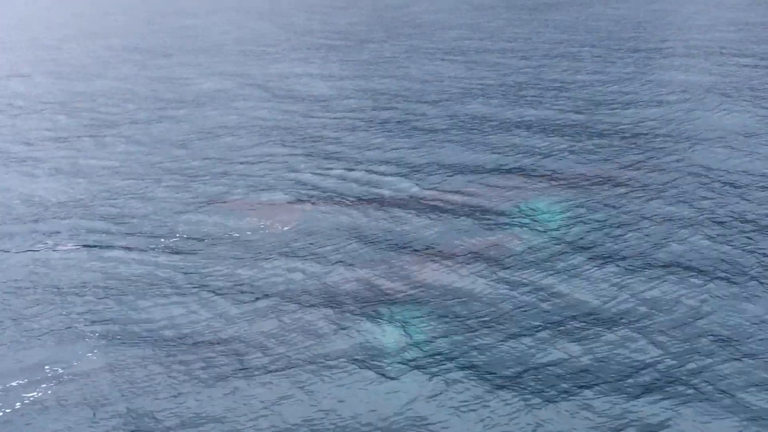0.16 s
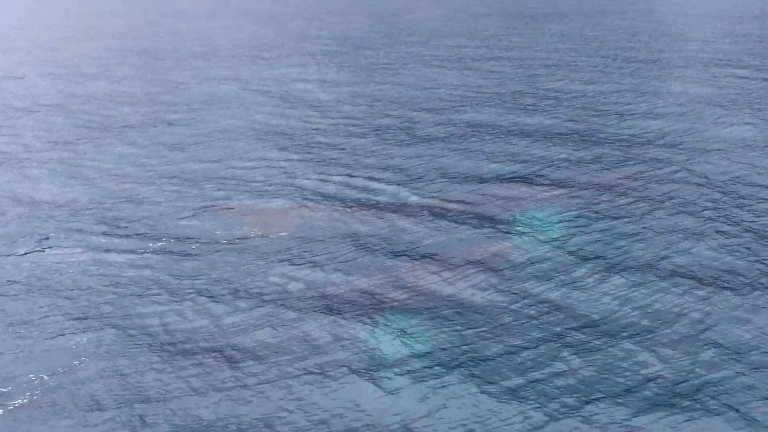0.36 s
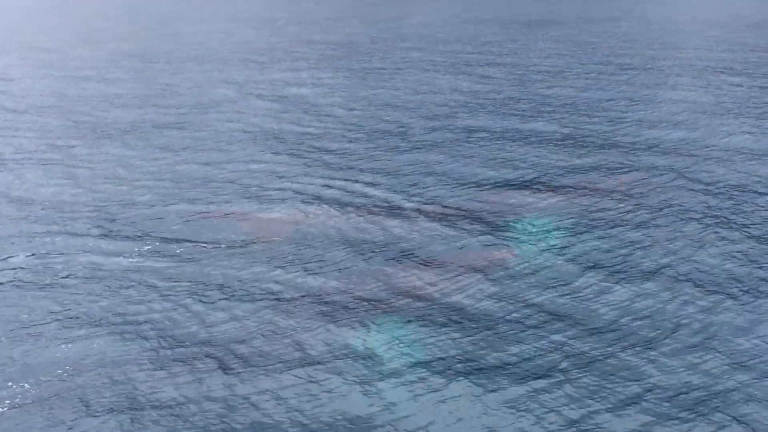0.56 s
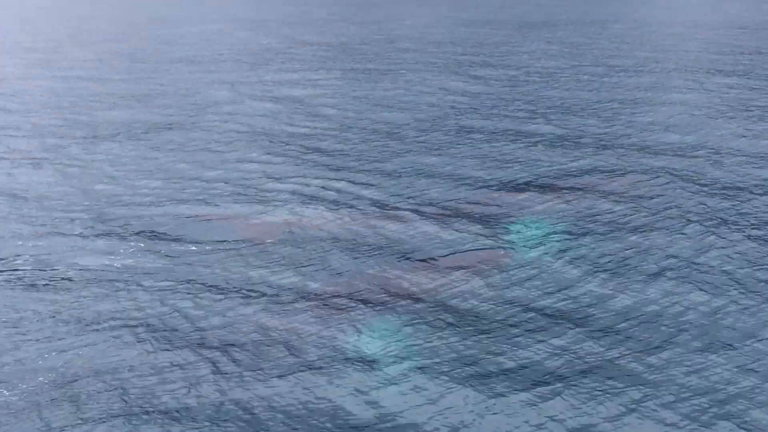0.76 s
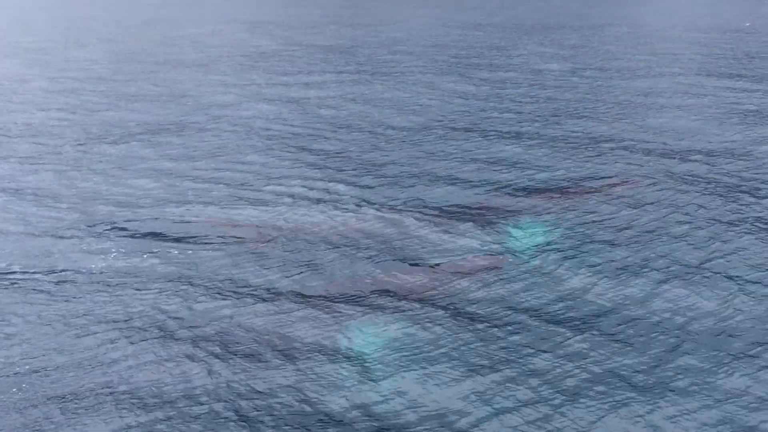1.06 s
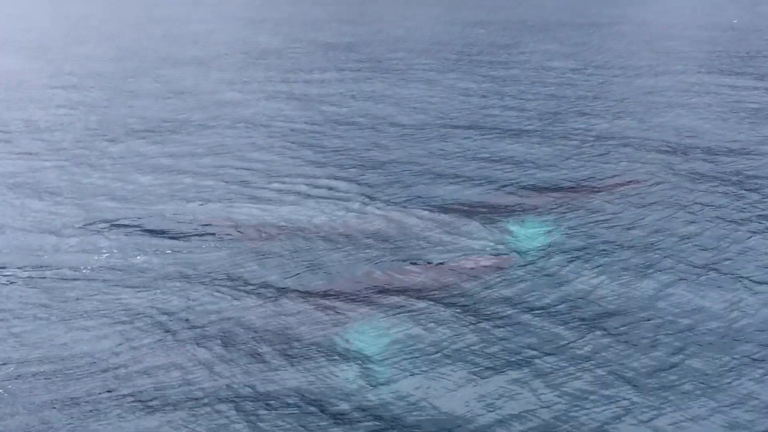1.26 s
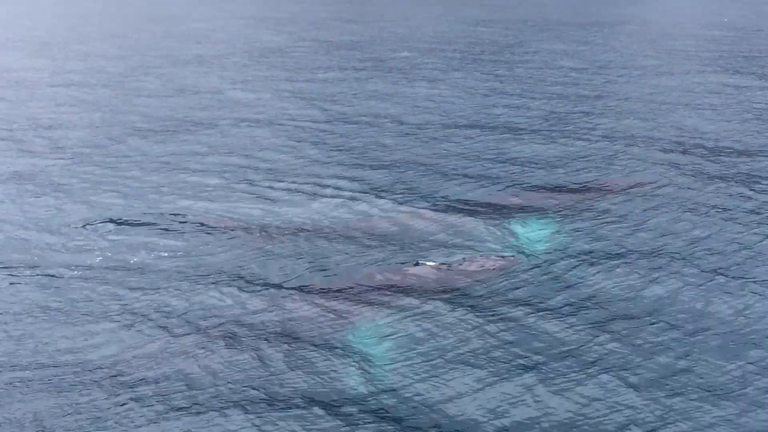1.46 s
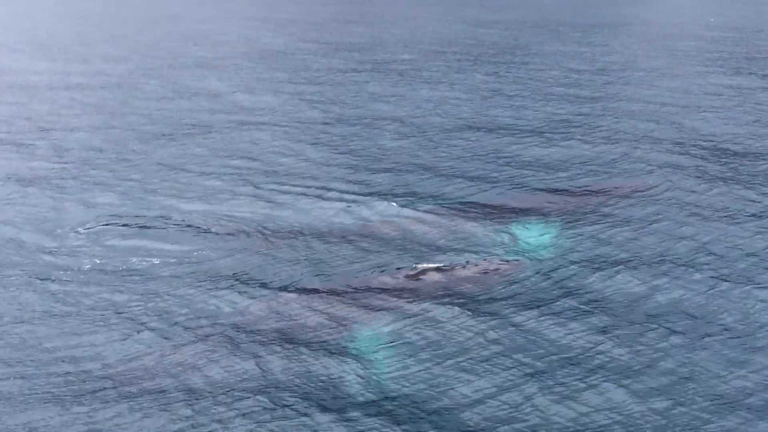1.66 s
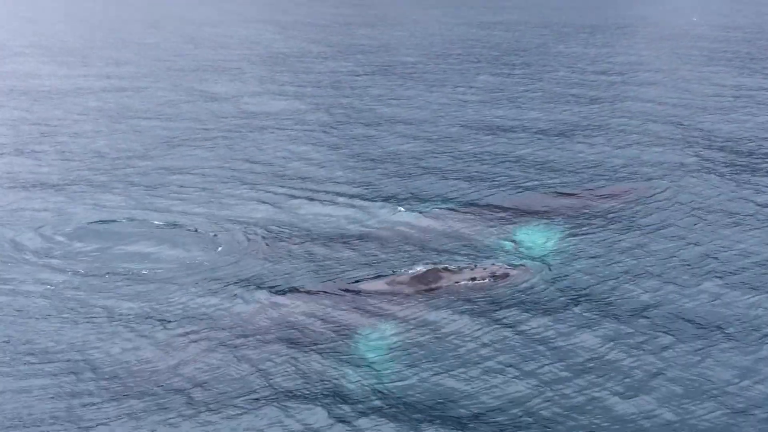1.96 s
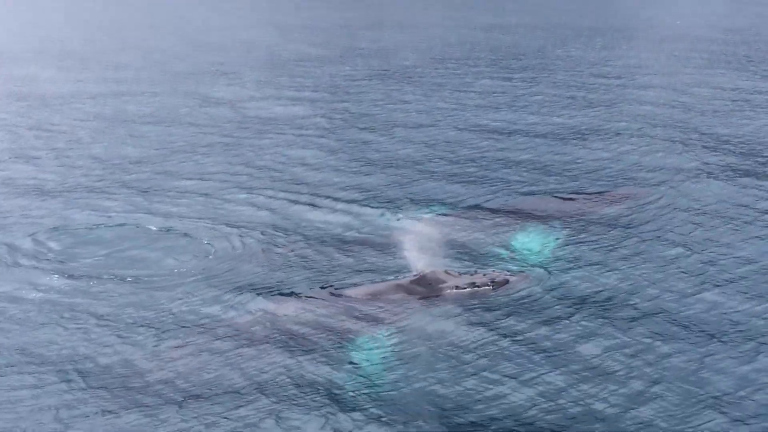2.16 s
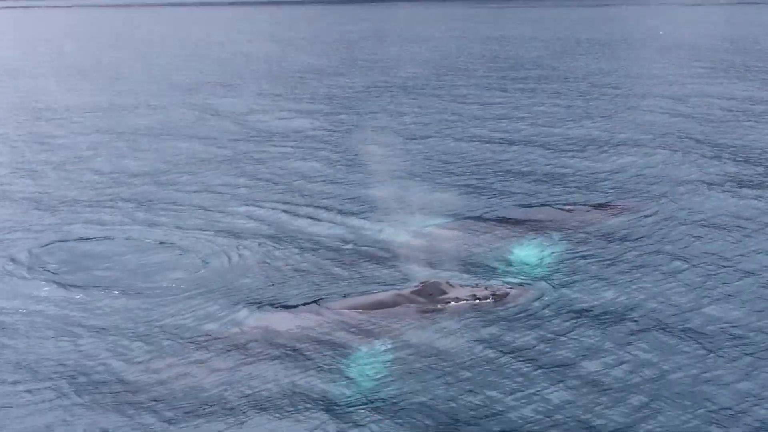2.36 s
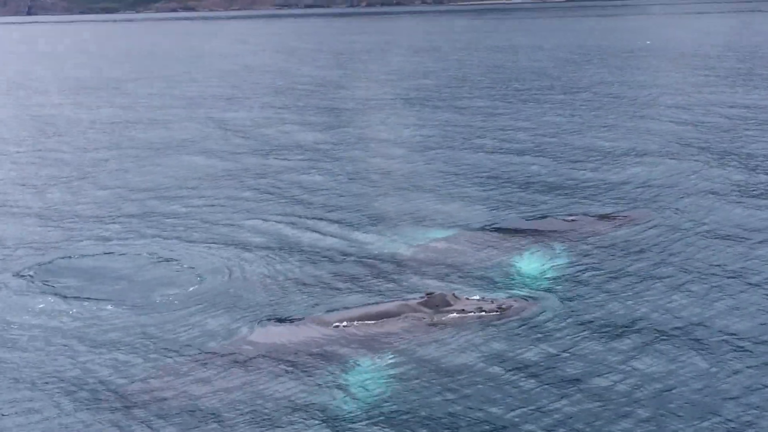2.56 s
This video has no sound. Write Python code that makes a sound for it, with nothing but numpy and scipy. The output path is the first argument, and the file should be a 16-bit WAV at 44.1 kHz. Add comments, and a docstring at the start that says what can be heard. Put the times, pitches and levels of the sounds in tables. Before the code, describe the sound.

Whale blow: a sudden breathy whoosh with spray near the end, after engine hum and wind thuds

```python
"""Open water, on deck of an idling boat: a whale surfaces and blows nearby, one microphone in the wind.
The blow opens with a noise spit, swells to a jet with hollow airway resonances and spray, and darkens as it fades.
The engine is a stack of sine orders with hull rings and a thin whine; gusts and flutter are shaped noise.
Wavelets slap as short broad resonances, gear ticks and knocks as struck noise, and the sea is a steady wash."""
import sys
import numpy as np
from scipy import signal
from scipy.fft import rfft, irfft
from scipy.io import wavfile

SR = 44100
rng = np.random.default_rng(int(sys.argv[2]) if len(sys.argv) > 2 else 0)


def wav_out(sig):
    """Save sig, one row per channel (or a flat mono array), as 16-bit PCM at SR to the path in sys.argv[1]."""
    wavfile.write(sys.argv[1], SR, np.round(np.clip(np.atleast_2d(sig).T, -1, 1) * 32767).astype(np.int16))


N = 119511
T = np.arange(N) / SR

# Every colour table is relative: its noise is scaled to rms 1 before a level is applied.
# force of the blow [t/s, level/dB]
BLOW_FORCE = [(2.08, -78), (2.12, -55.5), (2.175, -44), (2.24, -31.5), (2.33, -30), (2.41, -31), (2.5, -36),
              (2.6, -39), (2.71, -44)]
# jet colour with the blowhole at full pressure, then slack [f/Hz, level/dB per Hz]
JET_FULL_COLOUR = [(150, -4), (400, -3.5), (750, 4), (1080, -2.5), (1400, 4), (1850, -4.5), (2300, -2.5),
                   (2900, -5.5), (4300, -6), (5400, -9.5), (7000, -9), (9500, -14.5), (15000, -23)]
JET_SLACK_COLOUR = [(150, -11), (330, 1), (700, -6.5), (1080, -2.5), (1500, -3), (2000, -3), (3500, -9.5),
                    (5000, -11), (8000, -12.5), (10500, -23), (15000, -32)]
SLACK_FROM_S, SLACK_TO_S = 2.332, 2.573
JET_DB, JET_ROUGH_DB = -2, 1
SPUTTER_DB = 0.56  # added roughness as the pressure falls
# resonances of the airway [f/Hz, width/Hz, level at full pressure/dB, level when slack/dB]
AIRWAY_RESONANCES = [(677, 35, -16.5, -7), (785, 37, -15, -30), (908, 21, -13, -10), (1140, 18, -19, -13),
                     (1340, 135, -9.5, -34), (1544, 150, -14, -15.5), (2210, 140, -19.5, -25),
                     (3420, 430, -18, -26), (4660, 120, -19.5, -33), (6630, 90, -22, -40),
                     (7610, 120, -30, -36)]
AIRWAY_WAVER = 0.00607  # share of each pitch
AIRWAY_LEAD_S = 0.01  # the hollow tone builds a little ahead of the hiss
PUFF_DB, PUFF_HZ = 0.5, 30
# spit as the blowhole opens [f/Hz, level/dB per Hz]
SPIT_NOISE_COLOUR = [(800, -15), (2200, 3), (3500, 2), (7000, -5), (9000, -13), (15000, -21)]
SPIT_S, SPIT_DB, SPIT_DECAY_S = 2.091, -52, 0.015
# spray drops [f/Hz, level/dB per Hz]
DROP_COLOUR = [(800, -12), (3000, 0), (8000, -4.5), (10000, -8.5), (15000, -11)]
DROPS_PER_S, SPRAY_DB, SPRAY_LAG_S = 1400, -14, 0.034
# water fizzing off the whale's back; the half length is one standard deviation
SURFACE_S, SURFACE_HALF_S, SURFACE_DB = 1.5, 0.12, -74.5

# engine orders [multiple of the firing rate, level/dB]
ENGINE_ORDERS = [(.5, -45.5), (1, -25), (1.75, -51.5), (2, -62), (3.5, -57)]
FIRING_HZ, SPEED_WOBBLE, HUM_WOBBLE_DB = 75.72, 0.0046, 0.5
# rise and fall of the hum [t/s, level/dB]
HUM_SWELL = [(0, -1.5), (.15, -8.5), (.22, -3), (.36, -4), (.44, -5), (.53, 0), (.63, -5.5), (.72, 5.5),
             (.82, -2), (.9, 2.5), (1.05, -1.5), (1.12, 1.5), (1.22, -4.5), (1.36, -0.5), (2.4, 0),
             (2.58, 1.5), (2.71, 1)]
# narrow rings of hull and machinery [f/Hz, width/Hz, level/dB]
HULL_RINGS = [(113.5, 25, -49.5), (193.3, 26.5, -51.5), (489.3, 12, -57.5), (639, 10, -67.5),
              (907, 39, -67.5), (1826, 250, -68), (3355, 480, -71.5)]
WHINE_HZ, WHINE_WIDTH_HZ, WHINE_DB = 3425, 110, -70.5
WHINE_WAVER, WHINE_FLICKER_DB = 0.012, 2.5  # waver as a share of the pitch

# gusts that thud on the microphone [start t/s, end t/s, level/dB]
GUST_TIMES = [(-.05, 0.043, -29.5), (0.664, 0.793, -27), (0.837, 0.994, -29), (1.053, 1.198, -32),
              (2.38, 2.564, -34.5), (2.545, 2.76, -32)]
GUST_EDGE_S = 0.061
# colour of the gusts [f/Hz, level/dB per Hz]
GUST_NOISE_COLOUR = [(18, -43), (37, -6.5), (55, -9), (76, -4), (98, -7), (119, -1), (146, -23.5),
                     (300, -47.5), (1000, -65.5), (8000, -110)]
# lighter breeze at the microphone [t/s, level/dB]
BREEZE_LEVEL = [(0, -29), (.05, -31), (.2, -35), (.33, -34.5), (.45, -37), (.54, -37.5), (.63, -38.5),
                (.75, -48), (1.12, -62.5), (1.22, -38), (1.34, -42.5), (2.3, -56), (2.45, -54), (2.71, -40)]
# colour of the breeze [f/Hz, level/dB per Hz]
BREEZE_NOISE_COLOUR = [(25, -30), (70, 5), (160, 9.5), (260, -2.5), (500, -9), (900, -23), (1500, -37),
                       (4000, -55.5), (15000, -76.5)]
FLUTTER_DB, FLUTTER_HZ = 2, 44.5

# hollow slaps of water [peak t/s, level/dB, f/Hz, time scale either side/s]
WATER_SLAPS = [(.008, -26.5, 378, 0.0085), (.137, -29, 763, 0.0034), (0.139, -24, 290.2, 0.013),
               (0.238, -34.5, 480, 0.0029), (0.4, -34.5, 218.3, 0.0028), (0.494, -46, 520, .008),
               (.528, -36.5, 460, 0.0032), (1.027, -46, 420, 0.0065), (1.224, -37.5, 185, .018),
               (2.44, -31.5, 640, 0.0048), (2.465, -36, 620, 0.0079), (2.524, -34.5, 680, 0.011),
               (2.653, -40, 640, 0.051)]
SLAP_WIDTH = 0.8  # share of the pitch

# small ticks on deck [t/s, level/dB]
DECK_TICKS = [(0.813, -48), (1.811, -55)]
TICK_DECAY_S = 0.0015
# colour of the ticks [f/Hz, level/dB per Hz]
TICK_NOISE_COLOUR = [(500, -6), (2400, 4.5), (4000, -7), (6500, 1.5), (9500, -10), (15000, -15)]
# colour of the one knock, then of its tail [f/Hz, level/dB per Hz]
KNOCK_NOISE_COLOUR = [(300, -15), (700, 19.5), (1400, -4), (2350, 4.5), (3500, -5), (6000, -18),
                      (14000, -41)]
KNOCK_TAIL_COLOUR = [(250, -3.5), (680, 6), (1400, -11), (2500, -7.5), (3800, -2.5), (5500, -18.5),
                     (12000, -41)]
KNOCK_S, KNOCK_DB, KNOCK_DECAY_S = 0.860, -34.5, 0.013
KNOCK_TAIL_DB, KNOCK_TAIL_S = -51, 0.11

# steady wash of sea and engine [f/Hz, level/dB per Hz]
WASH_COLOUR = [(20, -23), (45, -1.5), (100, 2), (180, -7), (300, -13), (560, -24), (1150, -24.5),
               (1750, -34), (2500, -40), (4100, -45), (4900, -44), (5800, -48.5), (7000, -50), (10000, -58),
               (15000, -72)]
WASH_DB, HISS_DB = -39, -76.5
# level of the background above the bass [t/s, level/dB]
BACKGROUND_SWELL = [(0, 1), (.7, 1), (.98, -1.5), (1.14, -3), (1.22, -1.5), (1.4, 0), (1.6, 0.5),
                    (2.71, 2.5)]
EDGE_HZ = 15350  # upper limit of the recorder


def amp(db):
    """Decibels to gain."""
    return 10 ** (np.asarray(db) / 20)


def unit(x):
    """Scales to rms 1."""
    return x / np.sqrt(np.mean(x ** 2) + 1e-20)


def curve(points):
    """Joins (t/s, value) points by straight lines."""
    return np.interp(T, *np.transpose(points))


def colour(x, points):
    """Filters by an (f/Hz, level/dB) table and scales to rms 1."""
    hz, db = np.transpose(points)
    f = np.fft.rfftfreq(N, 1 / SR)
    gain = amp(np.interp(np.log(f + 1), np.log(hz), db))
    return unit(irfft(rfft(x) * gain, N))


def noise(points):
    """Noise of a given colour, rms 1."""
    return colour(rng.standard_normal(N), points)


def drift(rate_hz):
    """Smooth random wander, rms 1, rolling off above a rate."""
    f = np.fft.rfftfreq(N, 1 / SR)
    gain = (f > 0) / (1 + (f / rate_hz) ** 4)
    return unit(irfft(rfft(rng.standard_normal(N)) * gain, N))


def ring(hz, width_hz):
    """A resonance stirred by turbulence, rms 1; its centre may move."""
    phase = 2 * np.pi * np.cumsum(hz * np.ones(N)) / SR
    return unit(drift(width_hz / 2) * np.cos(phase) + drift(width_hz / 2) * np.sin(phase))


def strike(start, decay_s, rise_s):
    """Quick rise and exponential fall."""
    age = np.maximum(T - start, 0)
    return (1 - np.exp(-age / rise_s)) * np.exp(-age / decay_s)


def whale():
    """A spit as the blowhole opens, then a turbulent jet that puffs through the airway, and spray."""
    force = amp(curve(BLOW_FORCE)) * (T > BLOW_FORCE[0][0])
    slack = np.clip((T - SLACK_FROM_S) / (SLACK_TO_S - SLACK_FROM_S), 0, 1)
    jet = np.sqrt(1 - slack) * noise(JET_FULL_COLOUR) + np.sqrt(slack) * noise(JET_SLACK_COLOUR)
    airway = 0
    for hz, width, full_db, slack_db in AIRWAY_RESONANCES:
        level = amp(full_db + (slack_db - full_db) * slack)
        airway = airway + level * ring(hz * (1 + AIRWAY_WAVER * drift(12)), width)
    early_force = np.interp(T + AIRWAY_LEAD_S, T, force)
    puffs = np.maximum(force, early_force) * amp(PUFF_DB * drift(PUFF_HZ))
    roughness = amp((JET_ROUGH_DB + SPUTTER_DB * slack) * drift(110))
    air = (force * amp(JET_DB) * jet + puffs * airway) * roughness
    spray = amp(SPRAY_DB) * np.interp(T - SPRAY_LAG_S, T, force) * droplets()
    spit = amp(SPIT_DB) * strike(SPIT_S, SPIT_DECAY_S, 0.001) * noise(SPIT_NOISE_COLOUR)
    return air + spray + spit


def droplets():
    """Dense small drops of equal size: random clicks of either sign, coloured."""
    hits = rng.random(N) < DROPS_PER_S / SR
    return colour(hits * rng.choice([-1, 1], N), DROP_COLOUR)


def surfacing():
    """Water runs off the back as it breaks the surface."""
    swell = np.exp(-0.5 * ((T - SURFACE_S) / SURFACE_HALF_S) ** 2)
    return amp(SURFACE_DB) * swell * droplets()


def engine():
    """Orders of one slightly unsteady firing rate, rings of the hull, and a grainy whine."""
    turns = np.cumsum(FIRING_HZ * (1 + SPEED_WOBBLE * drift(5))) / SR
    hum = 0
    for order, db in ENGINE_ORDERS:
        hum = hum + amp(db) * np.sqrt(2) * np.sin(2 * np.pi * (order * turns + rng.random()))
    hum = hum * amp(curve(HUM_SWELL) + HUM_WOBBLE_DB * drift(42))
    rings = sum(amp(db) * ring(hz, width) for hz, width, db in HULL_RINGS)
    whine_level = amp(WHINE_DB + WHINE_FLICKER_DB * drift(25))
    whine = whine_level * ring(WHINE_HZ * (1 + WHINE_WAVER * drift(90)), WHINE_WIDTH_HZ)
    return hum + (rings + whine) * amp(curve(BACKGROUND_SWELL))


def wind():
    """Deep gusts and a lighter flutter of turbulence at the microphone."""
    gusts = 0
    for start, end, db in GUST_TIMES:
        inside = np.minimum(T - start, end - T)
        gusts = gusts + amp(db) * np.clip(inside / GUST_EDGE_S + 0.5, 0, 1)
    flutter = unit(noise(BREEZE_NOISE_COLOUR) * amp(FLUTTER_DB * drift(FLUTTER_HZ)))
    return gusts * noise(GUST_NOISE_COLOUR) + amp(curve(BREEZE_LEVEL)) * flutter


def slap(peak_s, db, hz, scale_s):
    """A short, broad, hollow resonance of trapped air."""
    shape = np.exp(1 - np.hypot(1, (T - peak_s) / scale_s))
    sound = shape * ring(hz, hz * SLAP_WIDTH)
    # give each slap the energy of its envelope, whatever the random draw
    return amp(db) * sound * np.linalg.norm(shape) / np.linalg.norm(sound)


def deck():
    """Dry ticks and one knock with a short tail, each a struck burst of noise."""
    tick_hits = sum(amp(db) * strike(s, TICK_DECAY_S, 0.00028) for s, db in DECK_TICKS)
    ticks = tick_hits * noise(TICK_NOISE_COLOUR)
    knock = amp(KNOCK_DB) * strike(KNOCK_S, KNOCK_DECAY_S, 0.0038) * noise(KNOCK_NOISE_COLOUR)
    tail = amp(KNOCK_TAIL_DB) * strike(KNOCK_S, KNOCK_TAIL_S, 0.0045) * noise(KNOCK_TAIL_COLOUR)
    return ticks + knock + tail


def sea():
    """Steady wash whose part above the bass swells and flickers, over a faint even hiss."""
    wash = amp(WASH_DB) * noise(WASH_COLOUR)
    bass = signal.sosfiltfilt(signal.butter(2, 250, fs=SR, output="sos"), wash)
    upper = (wash - bass) * amp(curve(BACKGROUND_SWELL) + 0.68 * drift(25))
    hiss = amp(HISS_DB) * rng.standard_normal(N)
    return bass + upper + hiss


def scene():
    """Whale, boat, wind and sea at one microphone."""
    slaps = sum(slap(*row) for row in WATER_SLAPS)
    return (whale() + surfacing() + engine() + wind() + slaps + deck() + sea())[None]


def record(dry):
    """The recorder's band limit, a steep low-pass."""
    lowpass = signal.firwin(611, EDGE_HZ, window=("kaiser", 9), fs=SR)
    return signal.oaconvolve(dry, lowpass[None], "same")


dry = scene()
out = record(dry)
wav_out(out)
```